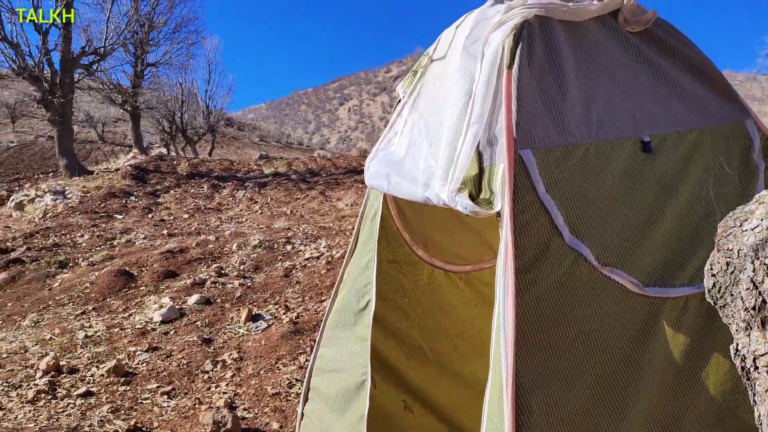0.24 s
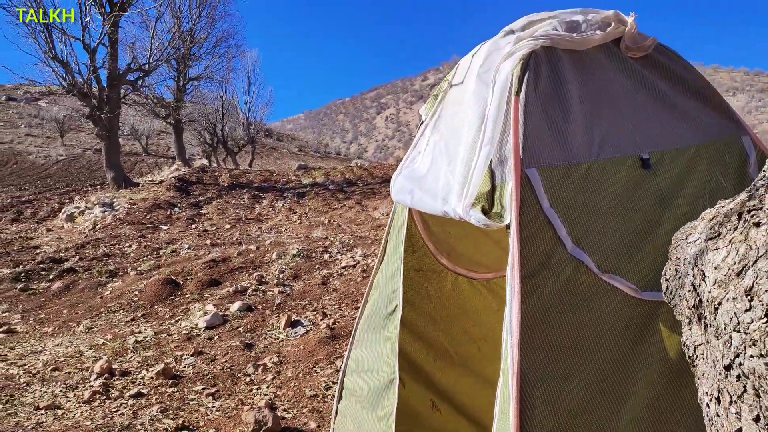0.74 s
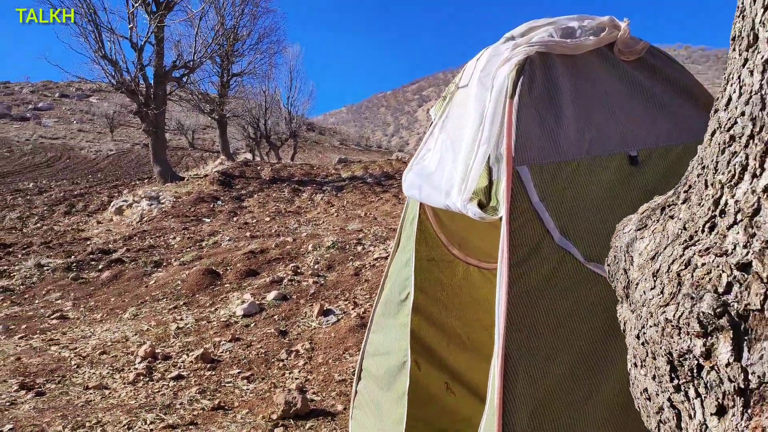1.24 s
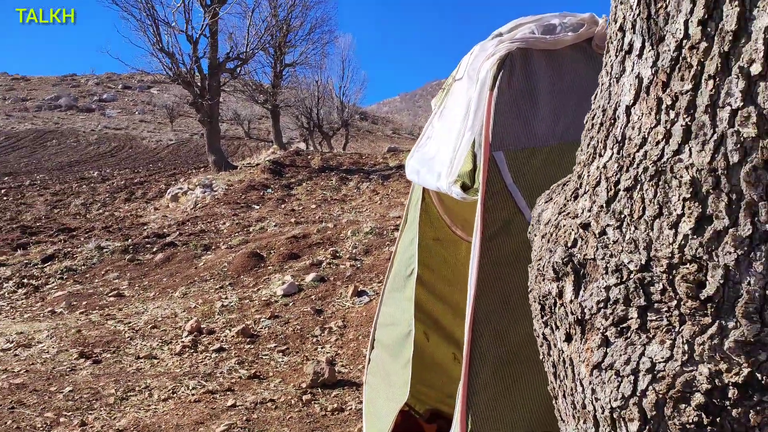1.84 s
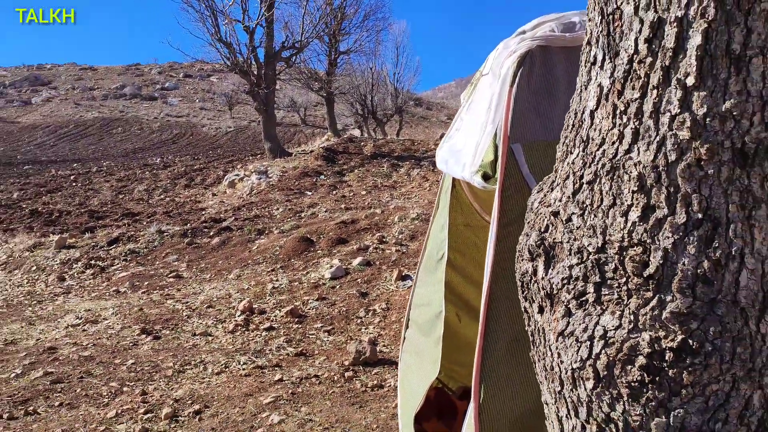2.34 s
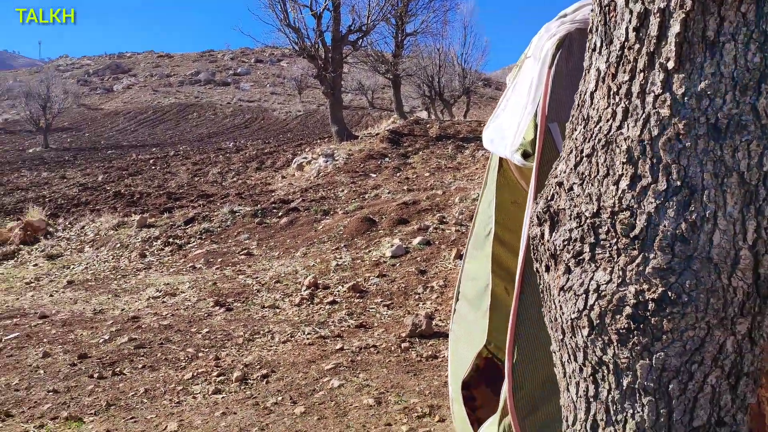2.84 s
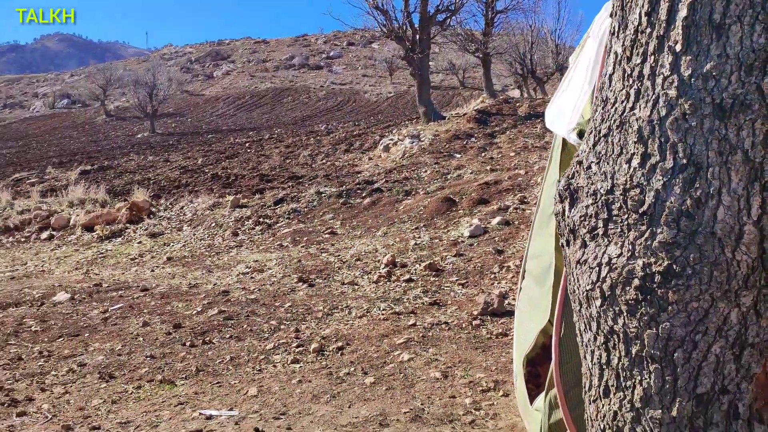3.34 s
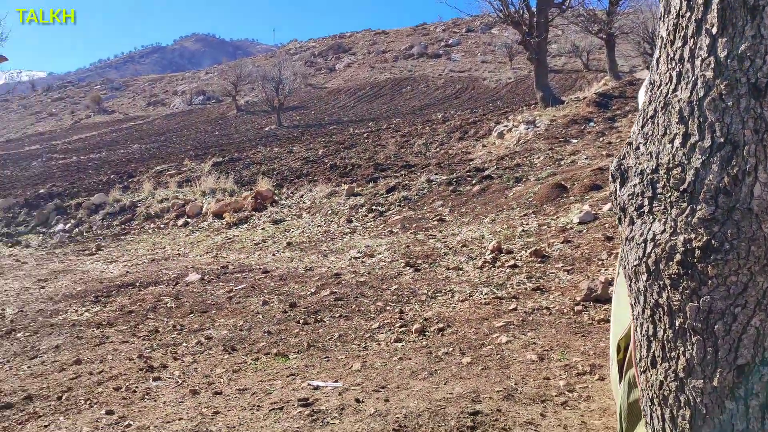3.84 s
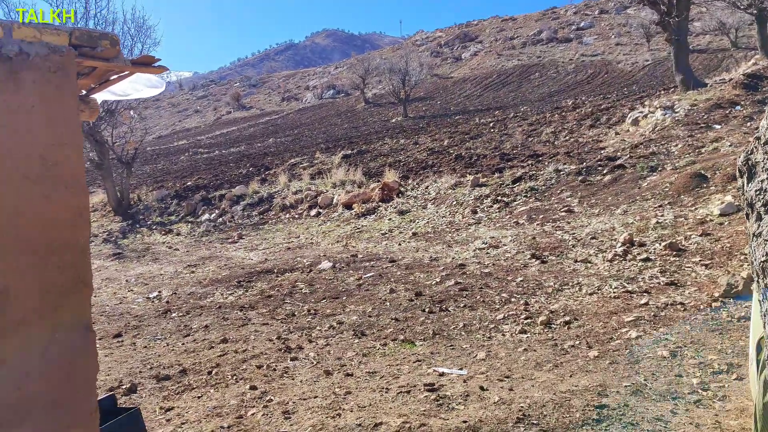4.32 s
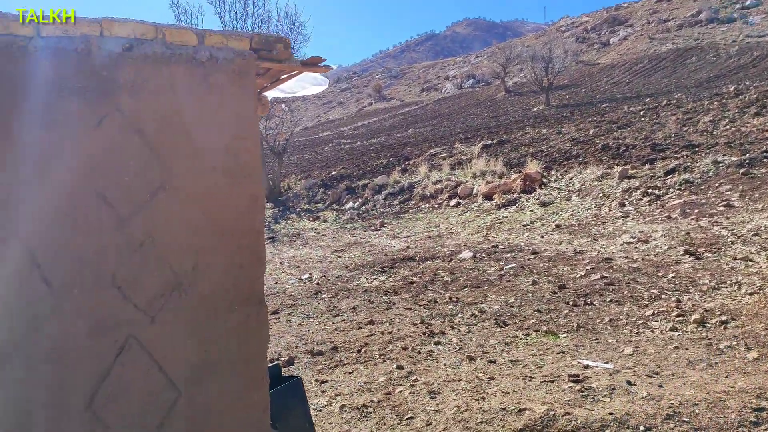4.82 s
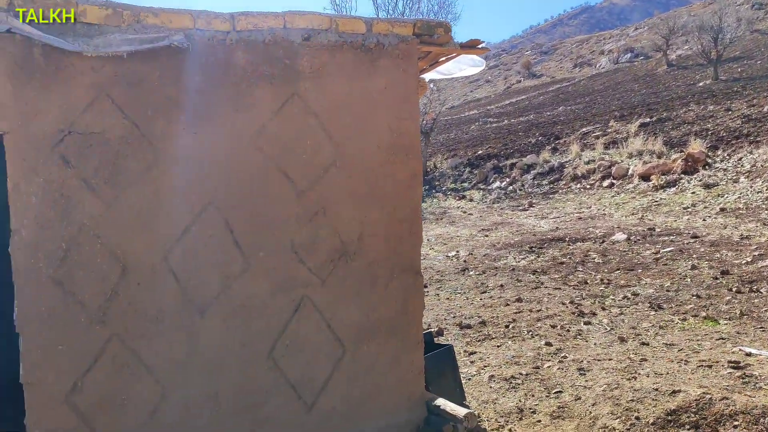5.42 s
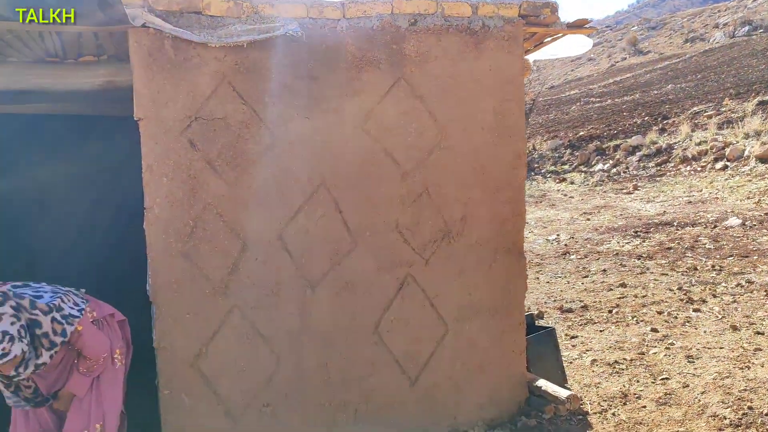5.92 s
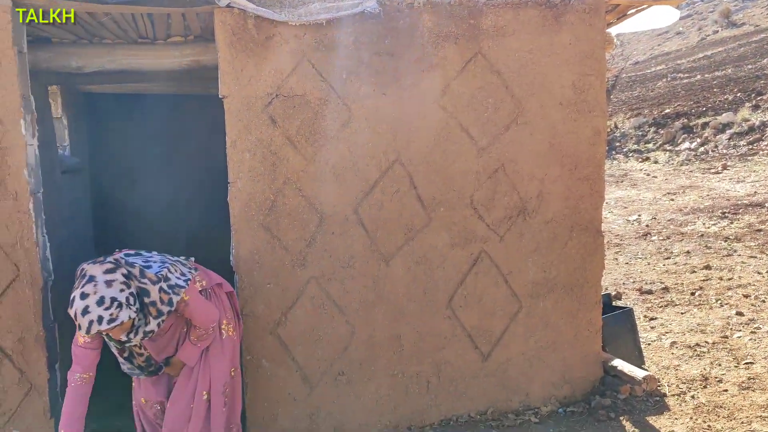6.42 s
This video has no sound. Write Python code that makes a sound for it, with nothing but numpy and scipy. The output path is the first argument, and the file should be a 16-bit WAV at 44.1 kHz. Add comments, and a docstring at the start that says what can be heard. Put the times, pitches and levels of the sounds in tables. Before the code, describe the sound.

A distant engine drones in light wind, with a deeper hum that sinks and fades. Close on the left, a hand broom brushes gritty soil in short, bright strokes, small stones clicking in the gaps. One faint hoot comes early, then three dull knocks spaced apart. The handheld microphone gradually turns to face the sweeping in the open air, while the engine climbs in pitch and swells to the end.

```python
"""Outdoors on dry dirt, handheld microphone. From the start a distant engine hums in light wind,
with a deeper hum that sinks and dies away. Close by on the left a short hand broom lands and sweeps
eleven quick swishes, grit ticking between them. A soft hoot follows the first; later come three dull
knocks. The microphone, whose right port is the brighter one, slowly turns towards the broom, while
the engine rises in pitch and grows louder to the end."""
import sys
import numpy as np
from scipy import signal
from scipy.fft import rfft, irfft
from scipy.io import wavfile
from scipy.ndimage import uniform_filter1d, map_coordinates

SR = 44100
rng = np.random.default_rng(int(sys.argv[2]) if len(sys.argv) > 2 else 0)


def file_out(sig):
    """Save sig as 16-bit WAV at sys.argv[1]."""
    # one column per channel
    cols = np.atleast_2d(sig).T
    # limit, then scale
    lim = np.clip(cols, -1, 1)
    pcm = np.round(lim * 32767).astype(np.int16)
    wavfile.write(sys.argv[1], SR, pcm)


N = 294147
TIME = np.arange(N) / SR
BINS = np.fft.rfftfreq(N, 1 / SR)

# The broom is pressed on, drawn along and lifted: t/s, length/s, attack/s, release/s, bristle hiss/dB,
# soil scrape/dB, sparkle of the tips/dB, grind of coarse soil/dB, bite of the stalks/dB,
# flick (growth of the hiss over the stroke)/dB, settling dust/dB
STROKES = [ (0.335, 0.15, 0.024, 0.021, -26, -43, 1, 2, -5, 0.5, -13),
           (1.143, 0.078, 0.035, 0.015, -21.5, -40, -3, 5.5, -1, -1, -13),
           (1.639, 0.06, 0.025, 0.015, -22.5, -39.5, -4, 3, -2.5, 0, -5.5),
           (2.133, 0.14, 0.018, 0.028, -26, -43, -10.5, 8, -1, 0.5, -15.5),
           (2.71, 0.14, 0.018, 0.034, -31, -41.5, -4.5, 5, -3, 4.5, -16.5),
           (3.355, 0.17, 0.019, 0.015, -38, -45.5, 5, 1, 0, 1, -12.5),
           (3.915, 0.21, 0.014, 0.022, -45, -50, 2, 3, -1, 1, -17),
           (4.495, 0.15, 0.021, 0.021, -42, -47.5, 7, -1, 4, 0, -15),
           (5.155, 0.1, 0.024, 0.039, -35, -42, 2, -2.5, 0, 2, -8.5),
           (5.834, 0.091, 0.017, 0.024, -37, -41, 6, -6.5, 2.5, 1, -14),
           (6.46, 0.094, 0.021, 0.03, -37.5, -43.5, 2, 0, 5.5, 1, -8.5)]
# The broom drops and drags briefly: t/s, length/s, release/s, hiss/dB, scrape/dB, slap of the stalks/dB
LANDINGS = [(0.154, 0.1, 0.011, -49.5, -64, -56), (1.013, 0.037, .018, -54, -60.5, -54),
            (1.7617, 0.063, 0.0087, -34.5, -46, -18), (1.928, 0.015, 0.031, -49, -58.5, -46),
            (2.038, 0.054, 0.02, -47, -64, -58), (2.099, 0.085, .018, -38.5, -51, -39),
            (3.15, 0.12, .016, -44.5, -51, -42), (3.67, 0.13, 0.02, -63.5, -69, -50),
            (3.818, 0.11, .018, -53, -60.5, -55), (4.393, 0.021, 0.022, -50, -57.5, -56),
            (4.77, .05, .018, -64, -67, -55), (4.873, 0.17, 0.026, -68.5, -69.5, -47),
            (5.136, .008, .018, -50, -57, -45), (5.472, 0.05, .018, -62, -67, -61),
            (6.196, 0.17, 0.016, -67, -64.5, -49)]


def amp(db):
    """Decibels to gain."""
    return 10 ** (np.asarray(db) / 20)


def unit(x):
    """Scales to an rms of one."""
    return x / np.sqrt(np.mean(x ** 2) + 1e-20)


def curve(rows):
    """Each column of a table as a curve over time."""
    s, *columns = np.transpose(rows)
    return [np.interp(TIME, s, c) for c in columns]


def spectrum(rows):
    """Each column of a table as a curve over log frequency."""
    hz, *columns = np.transpose(rows)
    return np.array([np.interp(np.log(BINS + 1), np.log(hz), c) for c in columns])


def shaped(x, gain):
    """Filters by a gain over frequency."""
    return irfft(rfft(x) * gain, N)


def band_rms(x, lo_hz, hi_hz):
    """Rms of the centre of a stereo sound within a band."""
    return np.std(shaped(x.mean(0), (BINS > lo_hz) & (BINS < hi_hz)))


def drift(rate_hz):
    """Random wander of rms one, up to about the given rate."""
    return unit(shaped(rng.standard_normal(N), np.exp(-(BINS / rate_hz) ** 2)))


def add(mix, s, sound):
    """Mixes a sound in at a time."""
    part = mix[round(s * SR):][:len(sound)]
    part += sound[:len(part)]


def recolour(x, humps, patchy_db):
    """Applies humps (f/Hz, width/octaves, lift/dB over time); random spectral patches come and go."""
    hz, s, frames = signal.stft(x, SR, nperseg=1024, noverlap=768)
    hz = hz[:, None] + 1
    at = np.minimum(s * SR, N - 1).astype(int)
    patches = uniform_filter1d(rng.standard_normal(frames.shape), size=2, axis=1)
    patches = unit(uniform_filter1d(patches, size=8, axis=2))
    hump_db = sum(lift[at] * np.exp(-(np.log2(hz / centre) / wide) ** 2) for centre, wide, lift in humps)
    frames = frames * amp(hump_db + patchy_db * patches)
    return signal.istft(frames, SR, nperseg=1024, noverlap=768)[1][:, :N]


def far_noise(colour, lag_s=0.00038):
    """Noise from far left: alike at both ports in the bass, later and brighter at the right one."""
    # Likeness of the two ports: f/Hz, correlation/0-1
    likeness = [(25, .8), (60, .95), (140, .975), (300, .83), (700, .7), (1500, .66), (3000, .45),
                (8000, .2)]
    # Balance of the two ports: f/Hz, left minus right/dB
    balance = [(200, 0), (550, -1), (900, -4), (1700, -7.5), (2700, -7.5), (5000, -1), (8500, -7),
               (12000, -11), (15000, -3)]
    same, tilt_db = spectrum(likeness)[0].clip(0, 1), spectrum(balance)[0]
    left, unrelated = rfft(rng.standard_normal((2, N)))
    right = (same * left + np.sqrt(1 - same ** 2) * unrelated) * np.exp(-2j * np.pi * BINS * lag_s)
    pair = np.array([left * amp(tilt_db / 2), right * amp(-tilt_db / 2)])
    return irfft(pair * amp(spectrum(colour)), N)


def engine_hum(start_hz=84.04, climb_hz_per_s=1.6, flutter_db=1.82, third_db=-18, lag_s=0.00011):
    """A distant engine's firing tone and overtones waver in moving air and reach the right port late."""
    # The firing tone fades and returns: t/s, level/dB
    firing = [(0, -53.5), (.8, -49.5), (1.5, -58), (2.2, -62.5), (2.7, -53.5), (4.5, -51), (5.1, -46.5),
              (6.1, -44.5), (6.35, -50), (6.67, -41.5)]
    # Its octave: t/s, level/dB
    octave = [(0, -86), (.5, -64.5), (1.8, -60), (4.6, -61), (5.3, -55), (6.35, -57), (6.67, -70)]
    firing_db, octave_db = curve(firing)[0], curve(octave)[0]
    hz = start_hz + climb_hz_per_s * TIME + .046 * TIME ** 2  # climbs ever faster
    turns = np.cumsum(hz * (1 + .002 * drift(rate_hz=5))) / SR
    angle = 2 * np.pi * np.array([turns, turns - hz * lag_s])
    orders = enumerate([firing_db, octave_db, octave_db + third_db], 1)
    return np.sqrt(2) * sum(amp(db + flutter_db * drift(rate_hz=11)) * np.sin(k * angle)
                            for k, db in orders)


def engine_noise(rumble_db=-63.5, roar_db=-59, swell_db_per_s=0.8542, gust_db=1.01):
    """Exhaust rumble and a broad roar, first raspy and then hollow, swell as the engine nears."""
    # Spectrum of the exhaust rumble: f/Hz, level/dB
    rumble_colour = [(10, -29), (25, -25), (45, -23), (70, -3.5), (110, 5), (160, -1.5), (215, -7.5),
                     (260, -17), (400, -39), (900, -53)]
    # Spectrum of the roar: f/Hz, level/dB
    roar_colour = [(100, -27), (250, -13.5), (350, -7.5), (550, -4), (850, 0.5), (1300, -1.5), (1900, -3),
                   (2400, -12.5), (3000, -20), (4500, -28.5), (7000, -44), (16000, -47)]
    # The roar's rasp: t/s, lift/dB
    rasp = [(0, -7.5), (2.7, -7), (3.6, -0.5), (4.05, 3), (4.8, 2), (5.7, 1), (6.67, 0.5)]
    # Its hollow rush: t/s, lift/dB
    rush = [(0, -8.5), (1.4, -2), (3.6, -3.5), (4.3, -1), (5.3, 0), (5.7, 8), (6.15, 1.5), (6.67, 3.5)]
    rumble, roar = far_noise(rumble_colour), far_noise(roar_colour)
    rumble, roar = rumble / band_rms(rumble, 105, 165), roar / band_rms(roar, 450, 1150)
    roar = recolour(roar, [(1990, 0.63, curve(rasp)[0]), (830, 0.46, curve(rush)[0])], patchy_db=2.5)
    swell_db = swell_db_per_s * TIME
    rumble *= amp(rumble_db + 1.78 * swell_db)  # grows faster than the roar
    roar *= amp(roar_db + swell_db + gust_db * drift(rate_hz=17))
    return rumble + roar


def deep_hum():
    """A second, deeper hum that sinks in pitch and dies away."""
    # Course of the hum: t/s, f/Hz, level/dB
    course = [(0, 52.5, -60), (1.3, 51.8, -62), (2, 49.7, -62), (2.6, 46, -68), (3.4, 44.7, -82)]
    hz, db = curve(course)
    return np.sqrt(2) * amp(db) * np.sin(2 * np.pi * np.cumsum(hz) / SR)


def open_air(rustle_db=-68):
    """A low rumble of wind and a faint, restless rustle."""
    # Spectrum of the rustle: f/Hz, level/dB
    rustle_colour = [(1000, -28), (4000, -27), (6500, -19), (8000, -7), (9500, 8), (12000, 14), (15500, 3)]
    # Strength of the wind rumble: t/s, level/dB
    wind = [(0, -55.5), (.6, -61), (1.1, -65), (2, -66), (3, -58), (4.5, -60), (6.67, -58)]
    # Its spectrum: f/Hz, level/dB
    wind_colour = [(10, -42), (25, -14), (40, -2), (52, -8), (64, -5.5), (110, 0), (300, -72)]
    rustle = recolour(unit(far_noise(rustle_colour)), [], patchy_db=3.5)
    rustle *= amp(rustle_db + 2.5 * drift(rate_hz=16))
    return rustle + amp(curve(wind)[0]) * unit(far_noise(wind_colour))


def yard(x, scatter_db, t60, lag_s=0.00034):
    """Direct sound reaches the right port late; stones and walls scatter a short tail to each port."""
    t = np.arange(4096) / SR
    taps = rng.standard_normal((2, len(t))) * amp(-60 * t / t60)
    taps *= amp(scatter_db) / np.linalg.norm(taps[0])
    taps[[0, 1], [0, round(lag_s * SR)]] += 1  # the direct path
    return signal.oaconvolve(x[None], taps / np.linalg.norm(taps[0]), axes=1)[:, :N]


def reflected(x, echo_s=.003, swing_s=0.000595, echo_db=-9.5):
    """Adds a near reflection: its notches slide through the spectrum as the broom moves."""
    delay_s = np.abs(echo_s + swing_s * drift(rate_hz=1.57))
    return x + amp(echo_db) * map_coordinates(x, [(TIME - delay_s) * SR], order=3)


def ports(x):
    """Sound from the broom's place, off axis and on axis: the right port rings near 12 kHz."""
    # The broom's colour at the ports: f/Hz, side left/dB, side right/dB, front left/dB, front right/dB
    broom_colour = [(506, -37, -42, -35, -24), (1080, -35, -33, -22, -20.5), (2260, -32, -17.5, -11, -8.5),
                    (2780, -33, -17, -8, -5.5), (4270, -20, -14.5, -10, -11.5),
                    (4740, -31, -18.5, -10, -15.5), (6300, -24.5, -22.5, -8.5, -12),
                    (6820, -19, -17, -9, -13), (7940, -65, -22, -17, -18.5), (8890, -38, 0, -12, 3.5),
                    (9500, -26, 4.5, -4, 1), (10850, -17, 5, 0.5, 3.5), (12050, -14, 14.5, -3, 6.5),
                    (13440, -8, 5.5, -2, -1), (15200, -17, 6.5, 2.5, -7)]
    gains = amp(spectrum(broom_colour))
    return shaped(x, gains[:2]), shaped(x, gains[2:])


def turned(side, front):
    """Blends from off axis to on axis as the microphone turns."""
    # Aim of the microphone: t/s, facing the broom/0-1
    aim = [(1.17, 0.05), (2.2, 0.17), (3.45, 0.44), (4.6, 0.78), (5.2, 0.95)]
    facing = curve(aim)[0].clip(0, 1)
    return side * (1 - facing) + front * facing


def soil_band(split_hz=7980):
    """Gain over frequency that keeps soil and stone below the split and drops hiss and snaps above."""
    return 1 / (1 + ((BINS + 1) / split_hz) ** 24)


def press(start, length, attack, release):
    """Pressure on the bristles, 0-1: a smooth rise, a hold and a smooth fall."""
    rise = 1 + np.tanh((TIME - start) / attack / 2)
    fall = 1 + np.tanh((start + length - TIME) / release / 2)
    return rise * fall / 4


def contact(soil_lead_s=0.002, soil_exponent=0.87, dust_rise_s=0.019, dust_decay_s=0.06):
    """Hiss and scrape in dB over time: strokes, settling dust and landings add in power."""
    hiss, scrape = amp(-76) ** 2, amp(-78.5) ** 2  # the stalks rustle faintly between strokes
    for s, length, attack, release, hiss_db, scrape_db, *_, flick_db, dust_db in STROKES:
        settling = np.exp(-np.maximum(TIME - s - length, 0) / dust_decay_s)
        dust = amp(dust_db) * press(s + length, np.inf, dust_rise_s, 1) * settling
        tips = np.hypot(press(s, length, attack, release), dust)
        soil = np.hypot(press(s - soil_lead_s, length, attack, release), dust)
        progress = np.clip((TIME - s) / length, 0, 1) - .5
        hiss += (amp(hiss_db + flick_db * progress) * tips) ** 2
        scrape += (amp(scrape_db) * soil ** soil_exponent) ** 2
    for s, length, release, hiss_db, scrape_db, _ in LANDINGS:
        force = press(s, length, attack=0.0015, release=release)
        hiss += (amp(hiss_db) * force) ** 2
        scrape += (amp(scrape_db) * force) ** 2
    return 10 * np.log10(hiss), 10 * np.log10(scrape)


def bristles(flicks_per_s=2200, spread_db=1.0, rub_db=-8, clump_db=-1.36):
    """Many stalks flick off grains of soil, in clumps, over a smooth rubbing."""
    size = amp(spread_db * np.minimum(rng.exponential(1, N), 4)) * rng.choice([-1, 1], N)
    flicks = unit(size * (rng.random(N) < flicks_per_s / SR))
    rubbing = amp(rub_db) * rng.standard_normal(N)
    return (flicks + rubbing) * amp(clump_db * drift(rate_hz=240))


def fan(bundles=3):
    """Bundles of stalks touch different spots, each with its own echoes, and share the load by turns."""
    loads = amp(4 * np.array([drift(rate_hz=11) for _ in range(bundles)]))
    loads /= np.linalg.norm(loads, axis=0)
    out = np.zeros((2, N))
    for load, lag_s in zip(loads, np.linspace(.00034, .00046, bundles)):
        out += load * yard(bristles(), scatter_db=6.5, t60=0.075, lag_s=lag_s)
    return np.array([reflected(port) for port in out])


def broom(judder_db=0.52, rasp_db=0.15, firm_db=-47):
    """Close on the left, bristles are drawn over dirt: a bright hiss above a lower scrape of soil."""
    hiss_db, scrape_db = contact()
    views, low = ports(fan()), soil_band()
    hiss = turned(*[shaped(v, 1 - low) / band_rms(v, 9000, 16000) for v in views])
    scrape = turned(*[shaped(v, low) / band_rms(v, 3000, 7200) for v in views])
    swish = hiss + amp(scrape_db - hiss_db + rasp_db * drift(rate_hz=45)) * scrape
    timbres = [(s + length / 2, sparkle, grind, bite)
               for s, length, *_, sparkle, grind, bite, _, _ in STROKES]
    sparkle_db, grind_db, bite_db = curve(timbres)
    humps = [(14100, 0.39, sparkle_db), (2860, 0.11, grind_db), (4060, 0.078, bite_db)]
    swish = recolour(swish, humps, patchy_db=3.8)
    # under a light touch few stalks catch, so the hiss breaks up into a crackle
    lightness = np.clip((firm_db - hiss_db) / 20, 0, 1)
    catch_db = lightness * (2 * drift(rate_hz=150) - 2)
    return amp(hiss_db + catch_db + judder_db * drift(rate_hz=13)) * swish


def grit(crumbs_per_s=30, crumb_decay_s=0.001, slap_decay_s=.003):
    """Stones snap dryly, clods crunch and landing stalks slap; fine crumbs rustle at random."""
    # Sharp ticks and crunches of grit, and two slaps of the landing broom:
    # t/s, bright snap/dB, lower body/dB, decay/s
    hits = [(.1555, -31, -35, .002), (.712, -53, -36, .002), (.764, -38, -40, .0004),
            (.770, -45, -44, .002), (.782, -62, -34, .004), (.8368, -36, -31, .0004),
            (.947, -42, -39, .005), (1.4504, -37, -40, .0004), (1.4778, -36, -31, .0004),
            (1.5287, -40, -37, .0004), (1.9298, -43, -36, .002), (1.957, -37, -27, .0004),
            (1.974, -40, -34, .0004), (2.4624, -33, -42, .0004), (2.4781, -34, -43, .0004),
            (2.5953, -38, -42, .0004), (3.0617, -39, -41, .002), (3.083, -48, -42, .002),
            (3.0907, -25, -41, .0003), (3.6689, -39, -28, .0004), (3.7023, -44, -36, .002),
            (3.7774, -37, -35, .0004), (3.845, -35, -39, .002), (3.8652, -31, -37, .002),
            (4.7551, -30, -36, .0004), (4.802, -44, -43, .002), (4.9654, -40, -40, .0004),
            (5.1318, -22, -27, .0008), (5.19, -13, -22, .0003), (5.236, -13, -22, .0003),
            (5.51, -47, -48, .002), (5.5254, -40, -43, .0004), (5.5795, -50, -30, .0004),
            (5.6361, -40, -40, .0004), (5.6676, -42, -42, .0004), (6.1213, -39, -38, .0004),
            (6.1328, -35, -30, .0004), (6.1537, -33, -31, .0004), (6.1976, -35, -29, .0004),
            (6.2101, -41, -28, .0004)]
    # Hard grit is fuller in the middle than the bristles: f/Hz, level/dB
    grit_colour = [(1500, 4), (3400, 9), (5500, 4), (7500, 4), (9500, 1), (16000, 2)]
    chance = rng.random((round(crumbs_per_s * N / SR), 2))
    crumbs = [(when * N / SR, -60 + 10 * size ** 2, -55 + 10 * size ** 2, crumb_decay_s)
              for when, size in chance]
    slaps = [(s, db, db, slap_decay_s) for s, *_, db in LANDINGS]
    t = np.arange(SR // 40) / SR
    snaps, bodies = np.zeros((2, N))
    for s, snap_db, body_db, decay_s in hits + slaps + crumbs:
        burst = np.exp(-t / decay_s) * rng.choice([-1, 1], len(t))
        add(snaps, s, amp(snap_db) * burst)
        add(bodies, s, amp(body_db) * burst)
    ticks = shaped(snaps, 1 - soil_band()) + shaped(bodies, soil_band())
    ticks = shaped(ticks, amp(spectrum(grit_colour)[0]))
    return turned(*ports(yard(ticks, scatter_db=-13, t60=.06)))


def hoot(start_s=0.94, length_s=0.15, start_hz=290, glide_hz_per_s=434, level_db=-60.5, waver=0.02):
    """One soft, fuzzy tone that swells, glides upwards and fades."""
    t = np.clip(TIME - start_s, 0, length_s)
    hz = (start_hz + glide_hz_per_s * t) * (1 + waver * drift(rate_hz=98))
    swell = np.sqrt(2) * amp(level_db) * np.sin(np.pi * t / length_s)
    return swell * np.sin(2 * np.pi * np.cumsum(hz) / SR)


def knocks():
    """Dull blows, like steps on hard earth, that die away quickly."""
    # The blows: t/s, level/dB
    blows = [(2.289, -40.5), (2.784, -45), (4.595, -42)]
    # What each rings with: f/Hz, level/dB, t60/s
    modes = [(232, -19, 0.032), (301, -3.5, 0.052), (440, 0, 0.019)]
    t, out = np.arange(SR // 6) / SR, np.zeros(N)
    ring = sum(amp(db - 60 * t / t60) * np.sin(2 * np.pi * hz * t) for hz, db, t60 in modes)
    for s, db in blows:
        add(out, s, amp(db) * ring)
    return out


def scene():
    """Broom and grit in front, the engine and the open air behind."""
    return broom() + grit() + knocks() + hoot() + engine_hum() + engine_noise() + deep_hum() + open_air()


def record(dry, edge_hz=15560):
    """The recorder's band limit."""
    lowpass = signal.firwin(511, edge_hz, window=("kaiser", 9), fs=SR)
    return signal.oaconvolve(dry, lowpass[None], "same")


dry = scene()
out = record(dry)
file_out(out)
```